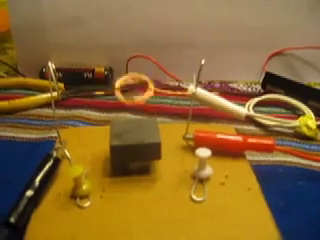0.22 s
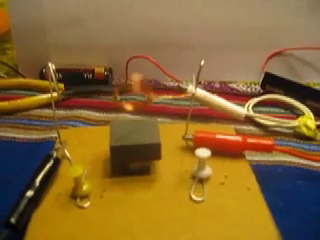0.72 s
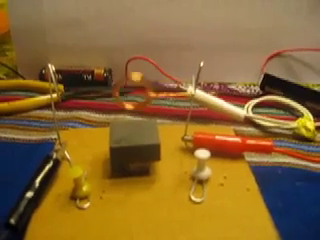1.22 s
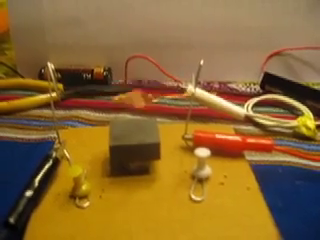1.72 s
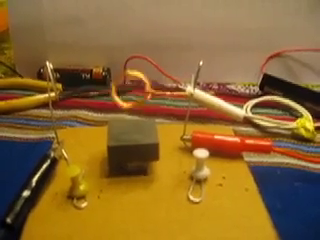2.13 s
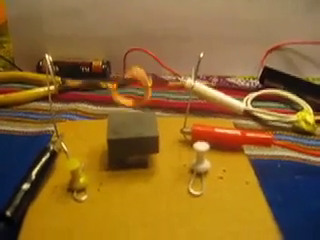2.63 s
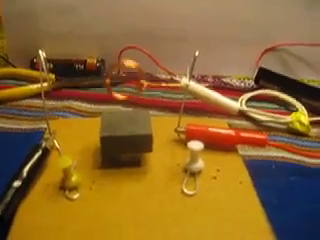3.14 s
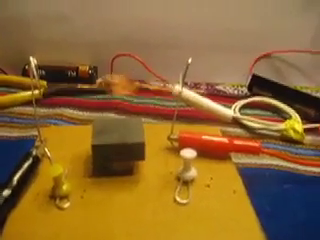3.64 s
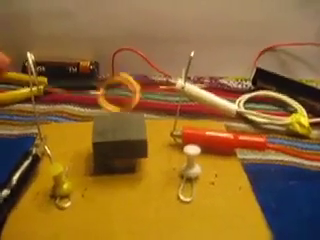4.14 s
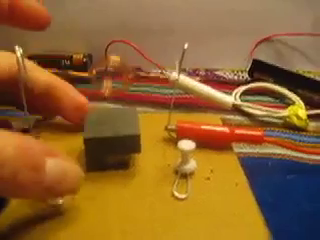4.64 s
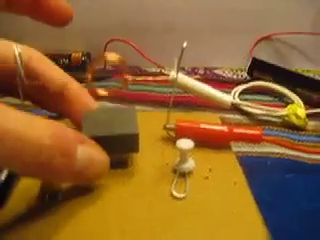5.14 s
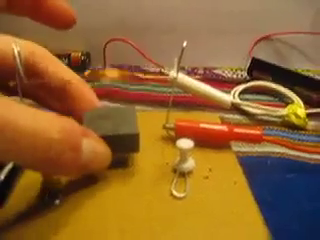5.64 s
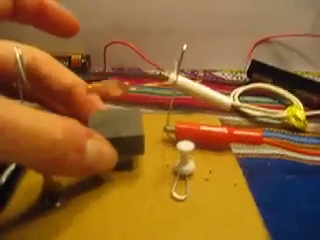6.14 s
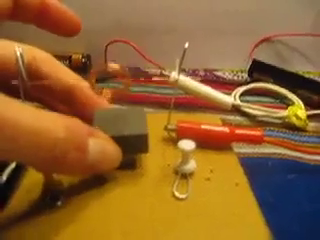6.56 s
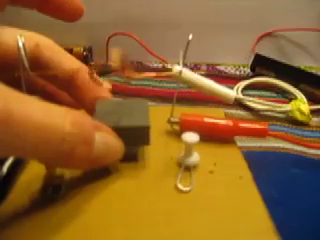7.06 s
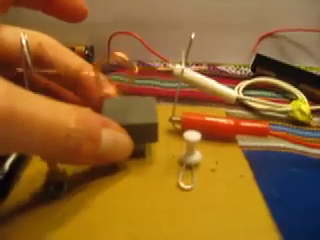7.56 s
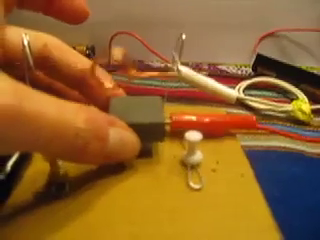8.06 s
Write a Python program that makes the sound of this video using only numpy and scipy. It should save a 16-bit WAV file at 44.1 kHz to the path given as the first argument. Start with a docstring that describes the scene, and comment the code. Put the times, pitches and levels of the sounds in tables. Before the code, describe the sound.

Quick, dry bursts of metallic ticking and gritty scraping repeat from a tiny homemade motor in a quiet hissy room; a sharp metal knock comes late.

```python
"""A homemade motor in a small quiet room: a wire coil spins over a magnet, its axle in two wire supports.
Over steady hiss, four or five times a second, the axle scrapes (gritty noise through resonances), hops, and
rattles down in a burst of ticks (short blows ringing supports, wire and cardboard base). Halfway a hand takes
hold of board and magnet: the wire and sliding colours change, the thuds grow. Near the end one loud metal snap
(decaying sines, soft-clipped) and a soft swish (coloured noise)."""
import sys
import numpy as np
from scipy import signal
from scipy.fft import rfft, irfft
from scipy.io import wavfile
from scipy.ndimage import uniform_filter1d

SR = 44100
rng = np.random.default_rng(int(sys.argv[2]) if len(sys.argv) > 2 else 0)


def wav_record(signal):
    """Record a signal, one row per channel, as 16-bit PCM in the file named by sys.argv[1]."""
    frames = np.transpose(np.atleast_2d(signal))
    bounded = np.clip(frames, -1, 1)
    # unit amplitude maps onto the largest positive 16-bit level
    quanta = np.round(bounded * 32767).astype(np.int16)
    wavfile.write(sys.argv[1], SR, quanta)


N = 366912

# Levels in the resonance, partial and hiss tables are relative within each table.
# room and microphone hiss: (frequency [Hz], level [dB])
HISS_SPECTRUM = [(20, -5.5), (60, -2.5), (150, 0.5), (400, -.5), (1000, -3), (2000, -4.5), (3600, -7.5),
                 (4800, -8.5), (6500, -9.5), (9000, -15), (12000, -16), (15500, -19), (16200, -41)]
# dull ring of the supports: (frequency [Hz], width [Hz], level [dB])
SUPPORT_MODES = [(2460, 484, -9), (2757, 320, -9), (3242, 640, -4), (3642, 240, -1), (4200, 400, -4),
                 (5100, 970, -13)]
# bright ring of the struck wire: (frequency [Hz], width [Hz], level board free [dB], level board held [dB])
WIRE_MODES = [(5720, 270, 5.5, 7), (6260, 820, 3, -13), (6700, 1300, -3, 0.5), (8640, 100, 3, -8),
              (9080, 4200, -9, -5.5), (10970, 690, -6, 2.5), (11500, 480, -23, -1.5), (11950, 400, -12, -4),
              (13250, 350, -16, -6), (13700, 700, -18, -10), (14960, 690, -10, -3)]
# cardboard base: (frequency [Hz], width [Hz], level [dB])
BOARD_MODES = [(564, 110, -4), (794, 320, -8.5), (1114, 183, 1.5), (1550, 27, 1.5), (1460, 420, -10.5),
               (1883, 350, -3.5)]
# thin ring of the rebound: (frequency [Hz], width [Hz], level [dB])
REBOUND_MODES = [(5850, 1150, -11), (6830, 310, 5), (10570, 2600, -3.5), (12000, 230, -8),
                 (12930, 360, 9.5), (12900, 280, -9), (15360, 390, -3)]
# thin, lingering ring of the supports: (frequency [Hz], width [Hz], level [dB])
LINGER_MODES = [(3632, 136, 1.5), (8550, 95, 0.5)]
# single knocks of the axle out of step with the bounces: (time [s], level [dB], hardness [dB])
KNOCKS = [(0.0074, -26, 1), (0.021, -31, -7), (0.6075, -24.5, 16), (1.0083, -33, -10), (1.225, -30, 3),
          (2.702, -31, -0.5), (2.9374, -35, 0.5), (3.1466, -27, 17), (3.1703, -30.5, -5),
          (3.514, -34.5, -7), (3.7373, -26.5, 21), (4.0692, -33, -2), (4.4793, -36, -11),
          (4.5233, -29.5, -8), (4.692, -31, -3.5), (4.7281, -24, 10), (5.5942, -32, 0.5),
          (6.1388, -34.5, -7), (6.35, -35.5, -2.5), (6.4503, -32.5, -4), (6.673, -32.5, -4),
          (6.794, -36.5, -8), (7.493, -29.5, 15), (7.5813, -36.5, 5)]
# one row per turn of the coil: scrape, flight, landing, three bounces; lengths count from the landing:
# (landing time [s], landing level [dB], hardness = bright over dull ring [dB], first hop length [s],
# rattle length [s], first bounce level [dB], second bounce level [dB], last bounce level [dB],
# flight length before landing [s], scrape level [dB])
TURNS = [(0.203, -28, 9.5, 0.023, .062, -30.5, -37, -41, 0.021, -40.5),
         (0.4066, -29, 13.5, .0188, .056, -29, -35.5, -35, 0.023, -40.5),
         (0.601, -26.5, 18.5, .0234, 0.072, -25, -35, -33, 0.016, -40.5),
         (0.8233, -26.5, 12.5, 0.02, 0.051, -31.5, -32.5, -34.5, 0.017, -41),
         (1.0354, -28, 11, .0188, 0.054, -33, -32.5, -32, .022, -39.5),
         (1.2307, -28, 7.5, 0.02, 0.066, -27, -30.5, -37, 0.026, -41.5),
         (1.4324, -28, 8.5, .0217, 0.067, -24.5, -31, -39, .021, -41),
         (1.6398, -27.5, 19, 0.022, 0.057, -29.5, -33, -32, 0.016, -38),
         (1.8373, -29, 11, 0.023, 0.059, -31, -34.5, -31, 0.021, -38.5),
         (2.0124, -44, -5, 0.027, 0.062, -41, -54, -50, 0.0066, -41),
         (2.1356, -26.5, 13.5, 0.024, 0.074, -26.5, -33, -33, .014, -42),
         (2.3673, -27, 9.5, .0241, 0.071, -33.5, -33, -31, 0.026, -40),
         (2.6168, -29, 8.5, 0.0084, .030, -35, -51, -54, 0.039, -39.5),
         (2.7086, -29.5, 18.5, 0.022, 0.065, -28.5, -36.5, -42, 0.027, -41.5),
         (2.9166, -24.5, 12, 0.03, 0.063, -30, -36, -28, 0.018, -41),
         (3.1378, -31.5, 7.5, 0.024, .068, -26, -33, -37.5, .022, -44),
         (3.3982, -28.5, 15.5, .0232, .0663, -28.5, -37, -36.5, 0.027, -43),
         (3.5720, -50, -8, 0.018, 0.044, -58, -61, -60, 0.0048, -42.5),
         (3.7308, -29, 11, .0245, .057, -31, -34.5, -36, .021, -36.5),
         (3.959, -48, -7, .0200, .040, -44, -54, -50, 0.008, -39),
         (4.0770, -34, 10.5, .0230, .0702, -29, -44, -32.5, 0.026, -43),
         (4.2920, -31, 4.5, .0240, 0.069, -29, -58, -30.5, 0.022, -37.5),
         (4.4948, -37, 10, .0201, .0606, -27, -38.5, -36.5, .033, -42.5),
         (4.7204, -27.5, 9, .0251, 0.07, -28, -30.5, -30.5, 0.025, -41),
         (4.9522, -30, -1.5, .0262, 0.07, -28.5, -48, -29, 0.022, -38),
         (5.1525, -27, 12.5, .0214, .0582, -27.5, -43, -33, 0.025, -42),
         (5.3742, -27.5, 10, .0264, .046, -30, -50, -35.5, 0.023, -37.5),
         (5.6, -26.5, 9.5, .0200, 0.055, -27.5, -37, -37.5, 0.028, -39),
         (5.8340, -28, 14, 0.026, 0.062, -30, -40, -37, 0.025, -40.5),
         (6.0590, -25, 19, .0190, .0538, -30.5, -34, -32.5, 0.022, -41),
         (6.2710, -24.5, 15, 0.018, .0542, -28.5, -32, -30, .016, -40.5),
         (6.4922, -26.5, 16.5, 0.022, 0.053, -32, -35.5, -36, 0.026, -39),
         (6.709, -25, 12, 0.029, 0.06, -31, -36, -30, 0.029, -40.5),
         (6.9346, -28, 16.5, 0.022, 0.059, -32, -35, -38, 0.029, -41),
         (7.1653, -27.5, 10, 0.024, 0.06, -29.5, -36, -31.5, 0.029, -39.5),
         (7.4003, -38, -2.5, 0.018, .040, -51, -50, -50, 0.034, -41),
         (7.4886, -26.5, 14, 0.024, .0598, -30.5, -34.5, -30, 0.023, -41),
         (7.7032, -27.5, 13, 0.02, 0.054, -30, -34, -29.5, .027, -38.5),
         (7.8927, -32, 10, .0220, .060, -48, -48, -46, .002, -40),
         (8.065, -31, -2.5, 0.02, 0.061, -35, -37, -42, 0.033, -41),
         (8.233, -50, -11, 0.022, 0.065, -54, -57, -54, .004, -44.5)]
# hiss of the sliding contact: (frequency [Hz], width [Hz], level board free [dB], level board held [dB])
SLIDE_MODES = [(6000, 380, 1, -0.5), (6200, 2200, -1, -2), (6950, 3200, -4, -3.5), (8450, 250, 6.5, -4),
               (8950, 2000, -12, -9), (11100, 390, -4.5, 3.5), (13000, 1400, -8, -6),
               (14600, 780, -4, -3.5)]
# crackle of the snags: (frequency [Hz], width [Hz], level [dB])
CRACKLE_MODES = [(6000, 3100, 0), (10700, 3800, -1), (13600, 830, -12)]
# partials of the loud snap: (frequency [Hz], level [dB])
SNAP_PARTIALS = [(130, -30), (600, -27), (1090, -11.5), (1450, -9.5), (1900, -7), (2570, -8.5), (3080, -2),
                 (3630, 2.5), (4180, -3.5), (4880, -1.5), (5535, 2.5), (6020, -3.5), (6400, -9), (6800, -4),
                 (8550, -11), (9520, -6.5), (10750, -20), (11750, -13), (14230, -28)]
# course of the swish after the snap: (time [s], level [dB])
SWISH_LEVEL = [(7.892, -36), (7.9, -46), (7.95, -44), (7.995, -48), (8.05, -51)]
# colour of the swish: (frequency [Hz], width [Hz], level [dB])
SWISH_MODES = [(1420, 580, -2), (3030, 1300, -4), (4580, 1100, 1), (5600, 700, 1.5), (6900, 1500, -4),
               (8900, 2000, -9), (12700, 2600, -19)]

TAP_SIZE = 2048  # samples in a blow or impulse response
HISS_DB = -54.5
HELD_S, HELD_THUD_DB = 4.4, 1.3  # the hand presses the board down, so it takes more of each blow
SKIP_DB = -10  # the wire skips halfway through the first hop, re landing
FAR_END_S, FAR_END_DB = .0075, -3  # other axle end: after first bounce, re mean dB of first two bounces
LEAD_S, LEAD_DB = .0083, -26  # the axle brushes a support before landing, re landing
SECOND_SHARE = .55  # second bounce, as a fraction of the time from first to last
SOFT_DB, SOFTEN_S = -9, .033  # hardness tends to this after landing, this fast
LANDING_THUD_DB, SKIP_THUD_DB, THUD_DB, KNOCK_THUD_DB = -9.5, -24, -14, -15  # re contact
JITTER_S, JITTER_DB = .0007, 2.5  # standard deviations for the lesser contacts
SCRAPE_S, SCRAPE_AT_DB, STRETCH_PER_DB = .031, -40, .06  # length at this level; lighter touch drags longer
SCRAPE_HARD_DB = -2  # bright hiss over dull ring
DRAG_DB, DRAG_HARD_DB, RUN_OUT_S = -20.5, -7, .016  # rub re late bounces; outlasts the last by RUN_OUT_S
SNAP_S, SNAP_DB = 7.8922, -3.5  # level before decay and clipping
NOTCH_HZ, EDGE_HZ = 7823, 16600


def amp(db):
    """Decibels to gain."""
    return 10 ** (np.asarray(db) / 20)


def evened(x):
    """Scales to rms 1."""
    return x / np.sqrt(np.mean(x ** 2) + 1e-20)


def add(mix, time_s, sound):
    """Mixes a sound in at a time."""
    start = max(round(time_s * SR), 0)
    part = mix[start:][:len(sound)]
    part += sound[:len(part)]


def causal(gain):
    """Minimum-phase impulse response of a gain over the full frequency circle."""
    log_gain = np.log(np.maximum(gain, 1e-5))
    return np.fft.ifft(np.exp(np.conj(signal.hilbert(log_gain)))).real


def body(modes, scatter_db=0, detune=0):
    """Impulse response of a resonant object; the spot struck shifts and favours some modes."""
    hz, width_hz, db = np.transpose(modes)[:, :, None]
    db = db + scatter_db * rng.standard_normal(db.shape)
    hz = hz * (1 + detune * rng.standard_normal(hz.shape))
    f = np.fft.rfftfreq(TAP_SIZE, 1 / SR)
    offset = (f - hz) / width_hz * 2.05  # width is about the full -6 dB width
    power = amp(db) ** 2 / (1 + offset ** 2) ** 2
    gain = np.sqrt(power.sum(0))
    return causal(np.concatenate([gain, gain[-2:0:-1]]))


def ringing(force, modes):
    """A running force through a body; rms 1."""
    return evened(signal.oaconvolve(force, body(modes))[:N])


def shares(hard_db):
    """Splits unit power into (dull, bright) gains."""
    bright = amp(hard_db)
    return np.array([1, bright]) / np.hypot(1, bright)


def grips(table):
    """Splits a table with two level columns into modes with the board free and held."""
    free = [(hz, width_hz, free_db) for hz, width_hz, free_db, _ in table]
    held = [(hz, width_hz, held_db) for hz, width_hz, _, held_db in table]
    return free, held


def hiss():
    """Steady room and microphone noise: white noise shaped by a spectrum."""
    hz, db = np.transpose(HISS_SPECTRUM)
    f = np.fft.rfftfreq(N, 1 / SR)
    colour = amp(np.interp(np.log(f + 1), np.log(hz), db))
    noise = irfft(rfft(rng.standard_normal(N)) * colour, N)
    return amp(HISS_DB) * evened(noise)


def taps():
    """Every axle contact as (time s, level dB, hardness dB, thud dB): knocks, landings, bounces."""
    contacts = [(s, db, hard_db, KNOCK_THUD_DB) for s, db, hard_db in KNOCKS]
    for turn, chance in zip(TURNS, rng.standard_normal((len(TURNS), 3, 2))):
        s, level_db, landing_hard_db, hop_s, rattle_s, first_db, second_db, last_db, _, _ = turn
        second_s = hop_s + SECOND_SHARE * (rattle_s - hop_s)
        far_end_db = (first_db + second_db) / 2 + FAR_END_DB
        main = [(0, level_db, LANDING_THUD_DB),
                (hop_s, first_db, THUD_DB),
                (second_s, second_db, THUD_DB),
                (rattle_s, last_db, THUD_DB)]
        lesser = [(-LEAD_S, level_db + LEAD_DB, SKIP_THUD_DB),
                  (hop_s / 2, level_db + SKIP_DB, SKIP_THUD_DB),
                  (hop_s + FAR_END_S, far_end_db, THUD_DB)]
        lesser = [(lag_s + JITTER_S * a, db + JITTER_DB * b, thud_db)
                  for (lag_s, db, thud_db), (a, b) in zip(lesser, chance)]
        for lag_s, db, thud_db in main + lesser:
            remaining = np.exp(-(lag_s / SOFTEN_S) ** 2)
            hard_db = SOFT_DB + (landing_hard_db - SOFT_DB) * remaining
            contacts.append((s + lag_s, db, hard_db, thud_db))
    return [(s, db, hard_db, thud_db + HELD_THUD_DB * (s > HELD_S))
            for s, db, hard_db, thud_db in contacts]


def strike(response, chatter, chatter_s, rise_s=.00051):
    """One blow and the brief chatter of the contact ring a body; energy of unit rms over 5 ms."""
    t = np.arange(TAP_SIZE) / SR
    force = rng.standard_normal(TAP_SIZE) * np.exp(-t / chatter_s) * (1 - np.exp(-t / rise_s))
    force *= chatter / np.linalg.norm(force)
    force[0] += 1
    ring = signal.fftconvolve(force, response)[:TAP_SIZE]
    return ring / np.linalg.norm(ring) * np.sqrt(.005 * SR)


def rattle(dull_db=-4.5, bright_db=-4.5, thud_db=-5.0, rebound_db=-10, rebound_s=.0046, linger_db=-15,
           settle_db=-50, settle_spread_db=4, graze_db=-19, graze_s=.0021, scatter_db=1.8):
    """Each contact grazes, rings support and wire, thumps the board, rebounds if hard, bounces faintly."""
    free, held = grips(WIRE_MODES)
    lingering, out = body(LINGER_MODES), np.zeros(N)
    for s, level_db, hard_db, board_db in taps():
        dull, bright = shares(hard_db)
        wire = body(held if s > HELD_S else free, scatter_db, detune=.0082)
        thin = body(REBOUND_MODES, scatter_db, detune=.025)
        supports, board = body(SUPPORT_MODES, scatter_db), body(BOARD_MODES, scatter_db)
        lag_s = rebound_s * bright ** 4 * rng.uniform(.8, 1.2)  # harder blows hop for longer

        graze = dull * strike(supports, chatter=6.3, chatter_s=.0012)
        graze += bright * strike(wire, chatter=3.5, chatter_s=.0017)
        add(out, s - graze_s * rng.random(), amp(level_db + graze_db) * graze)

        dull_ring = dull * strike(supports, chatter=1.5, chatter_s=.0021)
        add(out, s, amp(level_db + dull_db) * dull_ring)
        bright_ring = bright * strike(wire, chatter=.91, chatter_s=.0012)
        add(out, s, amp(level_db + bright_db) * bright_ring)
        linger = dull * strike(lingering, chatter=.89, chatter_s=.0028)
        add(out, s, amp(level_db + linger_db) * linger)

        rebound = bright ** 4 * strike(thin, chatter=2.5, chatter_s=.00079)
        add(out, s + lag_s, amp(level_db + rebound_db) * rebound)
        thud = strike(board, chatter=1.43, chatter_s=.0033)
        add(out, s + lag_s / 2, amp(level_db + board_db + thud_db) * thud)

        faint_s = s + rng.uniform(.0063, .045)
        add(out, faint_s, amp(settle_db - settle_spread_db * rng.exponential()) * graze)
    return out


def scrapes():
    """Every rub as (start s, end s, level dB, hardness dB): scrape to lift-off, drag under bounces."""
    rubs = []
    for s, _, _, _, rattle_s, _, second_db, last_db, flight_s, scrape_db in TURNS:
        lift_off_s = s - flight_s
        scrape_s = SCRAPE_S * np.exp(STRETCH_PER_DB * (SCRAPE_AT_DB - scrape_db))
        rubs.append((lift_off_s - scrape_s, lift_off_s, scrape_db, SCRAPE_HARD_DB))
        drag_db = (second_db + last_db) / 2 + DRAG_DB
        rubs.append((s + rattle_s / 2, s + rattle_s + RUN_OUT_S, drag_db, DRAG_HARD_DB))
    return rubs


def scrape(dull_db=-1.5, bright_db=-2.5, base_db=-15, crackle_db=-10, crackles_per_s=480,
           rise_s=.0094, fall_s=.0023, swell_db=4, grain_db=4, grain_s=.002):
    """The axle drags over the supports: gritty friction swells to mid-rub, then holds to the end."""
    t = np.arange(N) / SR
    pressure = np.zeros((2, N))  # dull, bright
    for start_s, end_s, level_db, hard_db in scrapes():
        near = (t > start_s - .1) & (t < end_s + .05)
        u = t[near]
        edges = np.exp(np.minimum(u - start_s, 0) / rise_s - np.maximum(u - end_s, 0) / fall_s)
        swell = amp(np.interp(u, [start_s, (start_s + end_s) / 2], [-swell_db, .8]))
        pressure[:, near] += shares(hard_db)[:, None] * amp(level_db) * edges * swell

    slips = evened(uniform_filter1d(rng.standard_normal(N), int(grain_s * SR)))
    friction = rng.standard_normal(N) * amp(grain_db * slips)
    # tiny snags of the wire crackle on top
    snags = (rng.random(N) < crackles_per_s / SR) * rng.standard_normal(N)

    free, held = (ringing(friction, modes) for modes in grips(SLIDE_MODES))
    slide = np.where(t > HELD_S, held, free)
    low = amp(dull_db) * ringing(friction, SUPPORT_MODES)
    low += amp(base_db) * ringing(friction, BOARD_MODES)
    high = amp(bright_db) * slide + amp(crackle_db) * ringing(snags, CRACKLE_MODES)
    return pressure[0] * low + pressure[1] * high


def room(x, t60_s=.11, dull_hz=6000):
    """Short, dull reverberation of table and near wall: decaying low-passed noise from 3 ms on."""
    t = np.arange(SR // 2) / SR
    tail = rng.standard_normal(len(t)) * amp(-60 * t / t60_s) * (t > .003)
    tail = signal.sosfilt(signal.butter(1, dull_hz, fs=SR, output="sos"), tail)
    return signal.oaconvolve(x, tail / np.linalg.norm(tail))[:N]


def snap(length_s=.0026, shape=1.95, ceiling=.65):
    """Hard metal knock, probably coil on magnet: partials die in milliseconds, overload the microphone."""
    t = np.arange(TAP_SIZE) / SR
    partials = [(-1) ** k * amp(db) * np.sin(2 * np.pi * hz * t)
                for k, (hz, db) in enumerate(SNAP_PARTIALS)]
    decay = np.exp(-(t / length_s) ** shape)
    ring = amp(SNAP_DB) * evened(sum(partials)) * decay
    out = np.zeros(N)
    add(out, SNAP_S, ceiling * np.tanh(ring / ceiling))
    return out


def swish():
    """Soft hiss that lingers after the snap: noise through broad resonances."""
    s, db = np.transpose(SWISH_LEVEL)
    level = amp(np.interp(np.arange(N) / SR, s, db, left=-np.inf, right=-np.inf))
    return level * ringing(rng.standard_normal(N), SWISH_MODES)


def scene():
    """Hiss, motor, snap and swish, with motor and snap also sent to the room."""
    motor, knock = rattle() + scrape(), snap()
    reverb = room(amp(-21.5) * motor + amp(-45) * knock)
    return (motor + knock + swish() + reverb + hiss())[None]


def record(dry, notch_half_width_hz=440, notch_db=-22):
    """The microphone has a deep notch in the treble; then a low-pass band limit."""
    offset_hz = abs(np.fft.fftfreq(TAP_SIZE, 1 / SR)) - NOTCH_HZ
    depth = amp(notch_db)
    recovery = offset_hz ** 2 / (offset_hz ** 2 + notch_half_width_hz ** 2)
    notch = causal(depth + (1 - depth) * recovery)
    coloured = signal.oaconvolve(dry, notch[None])[:, :N]
    band_limit = signal.firwin(301, EDGE_HZ, window=("kaiser", 9), fs=SR)
    return signal.oaconvolve(coloured, band_limit[None], "same")


dry = scene()
out = record(dry)
wav_record(out)
```